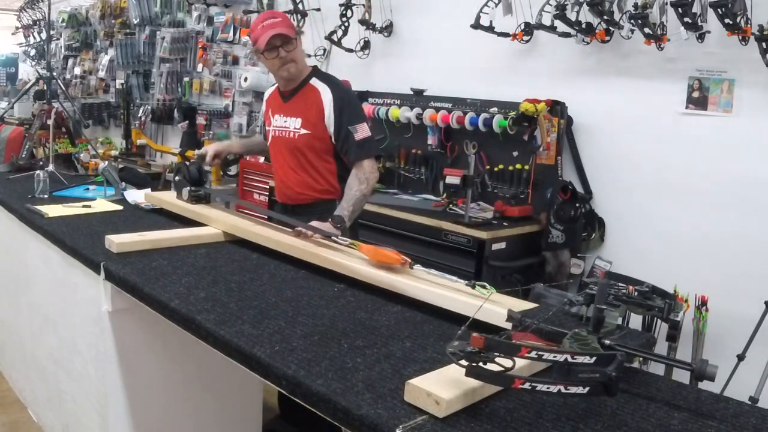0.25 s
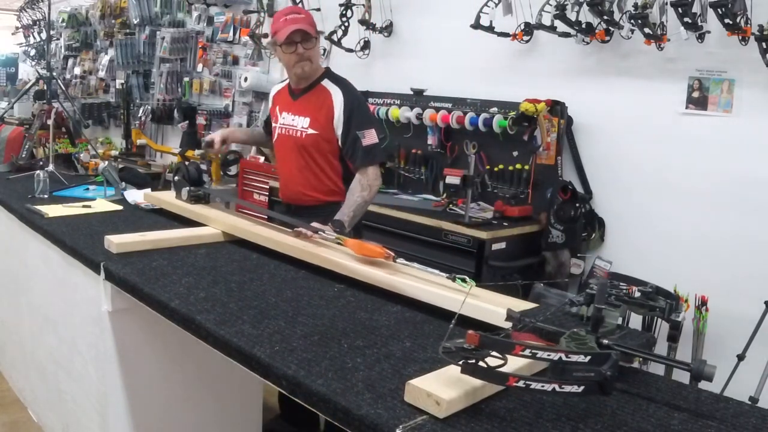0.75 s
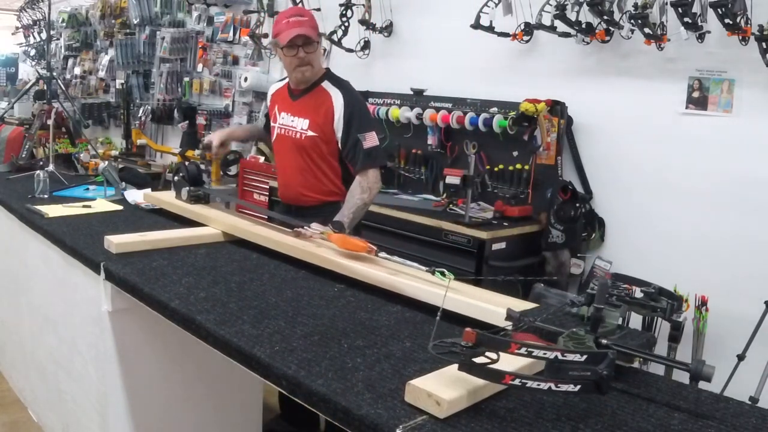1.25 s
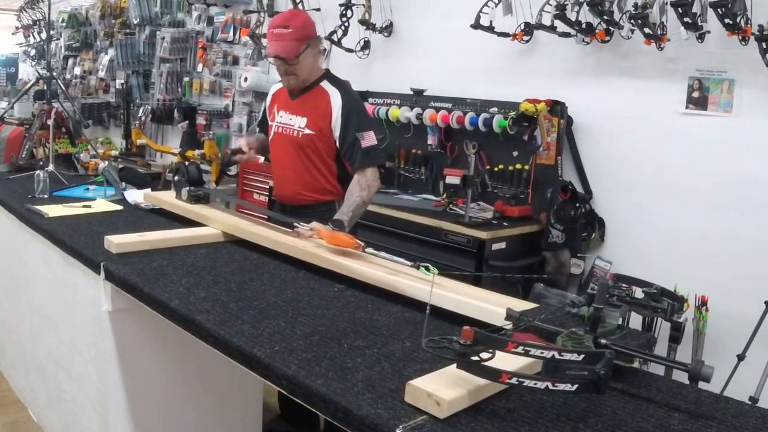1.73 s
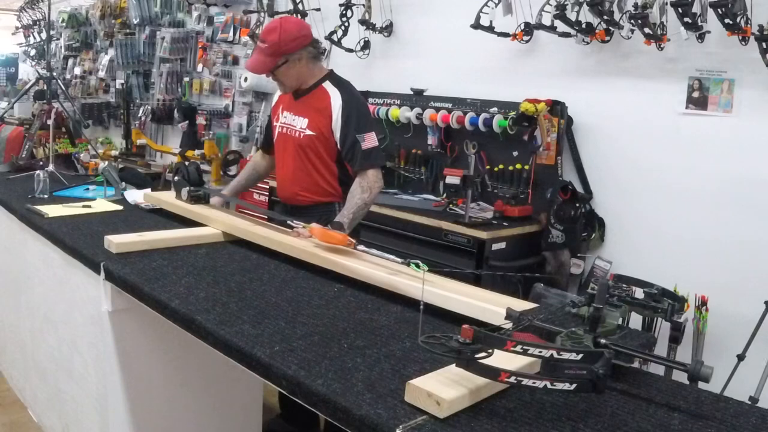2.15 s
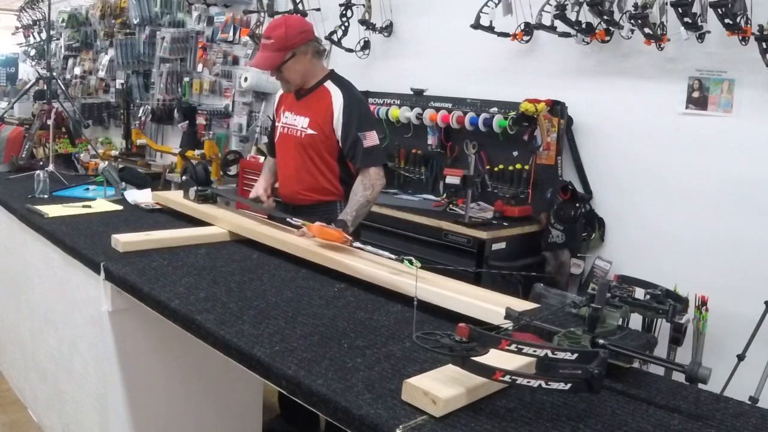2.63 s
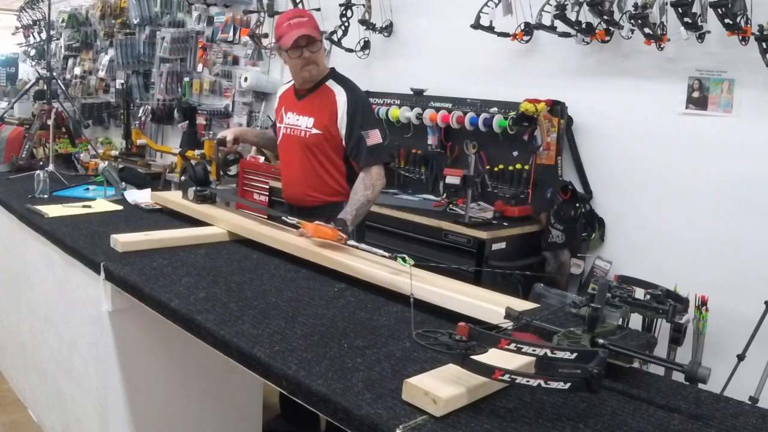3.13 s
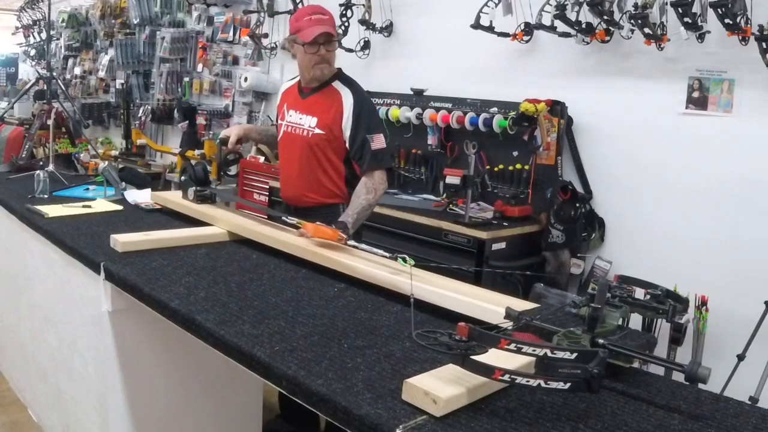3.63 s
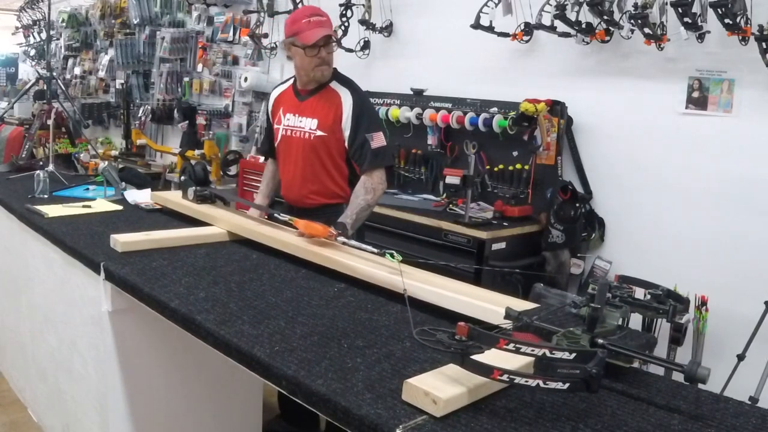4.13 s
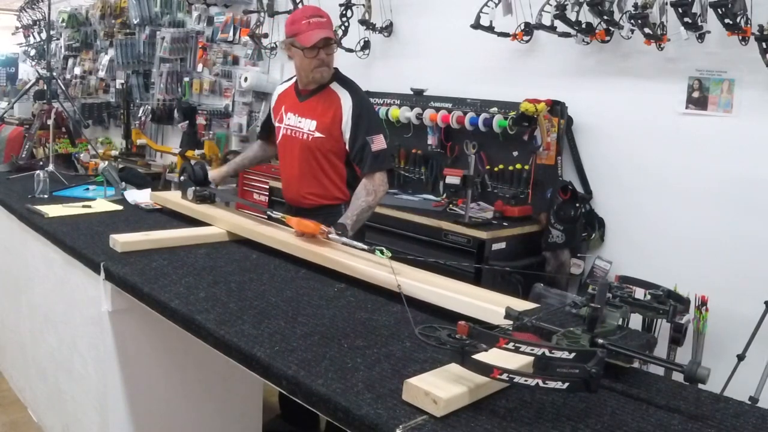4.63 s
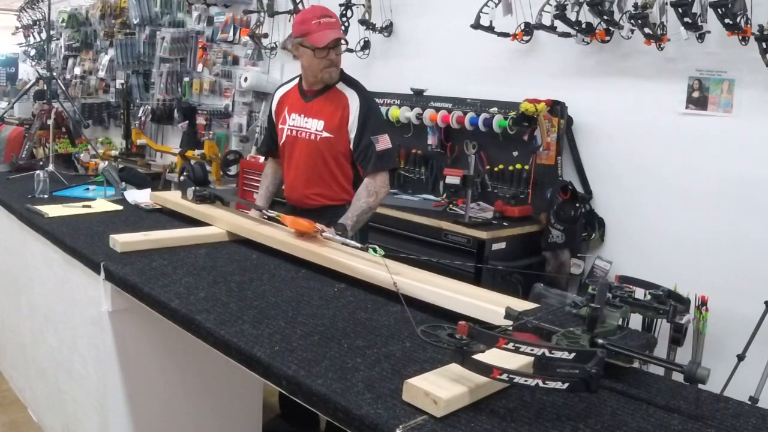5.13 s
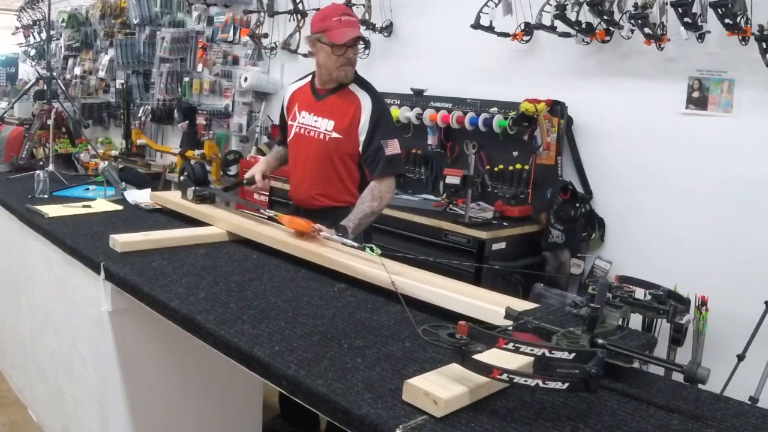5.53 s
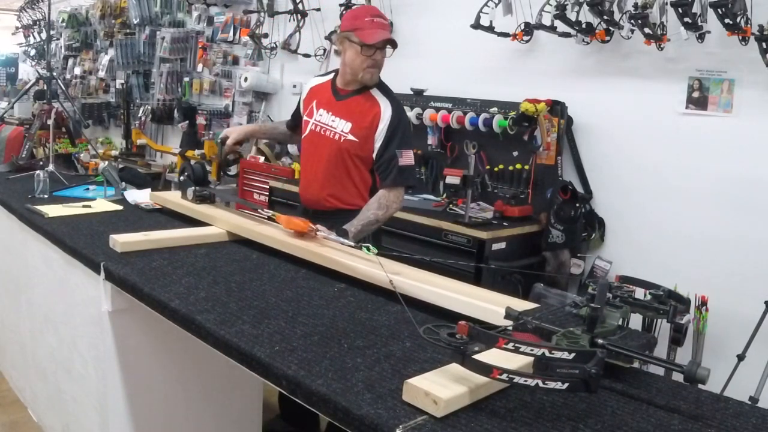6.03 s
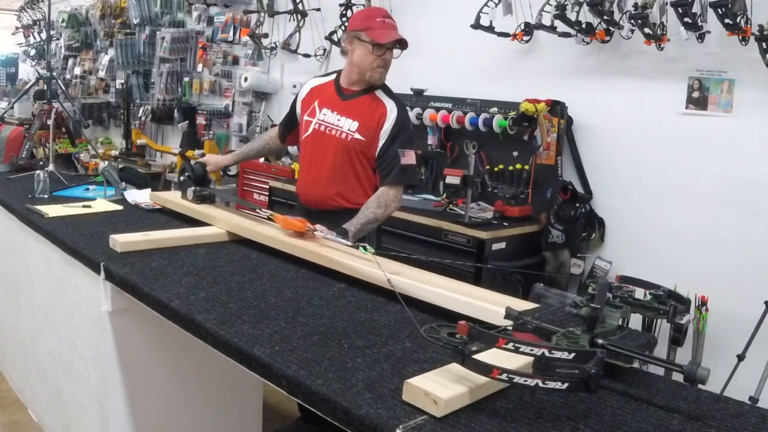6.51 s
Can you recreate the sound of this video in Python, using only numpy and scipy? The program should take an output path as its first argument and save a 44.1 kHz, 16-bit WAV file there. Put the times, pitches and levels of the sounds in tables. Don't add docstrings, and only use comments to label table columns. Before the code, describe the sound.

A hand-cranked winch on a wooden board rattles off loud, bright ratchet clicks, nearly twenty a second at the quickest, with gears grinding faintly beneath. The clicks loosen and stop just before three seconds. After a short near-silence with tiny knocks, clicking restarts and gradually slows to separate snaps. Close mono microphone in a hard-walled workshop with short reflections and a faint fan hum.

```python
import sys
import numpy as np
from scipy import signal
from scipy.fft import rfft, irfft, next_fast_len
from scipy.io import wavfile
from scipy.ndimage import uniform_filter1d, map_coordinates

SR = 44100
rng = np.random.default_rng(int(sys.argv[2]) if len(sys.argv) > 2 else 0)


def master(y):
    cut = np.clip(np.atleast_2d(y).T, -1, 1)
    pcm = np.round(cut * 32767)
    wavfile.write(sys.argv[1], SR, pcm.astype(np.int16))


def level_to_linear(level):
    exponent = np.asarray(level, float) / 20
    return 10 ** exponent


N = 298204
LEAD, RING, SPAN = 512, 8192, 17408

# f/Hz, width/Hz, level/dB
SPRING = [(1870, 1200, -5.5), (2228, 246, 5.5), (2362, 235, 3), (2596, 170, -3), (3123, 544, -11.5)]
STEEL = [(3306, 380, -2.5), (4320, 260, 2), (4890, 420, -0.5), (5920, 2000, -8), (6980, 220, 0.5),
         (7360, 570, -6), (8370, 510, 1), (9350, 840, -7.5), (12700, 830, -13), (15300, 670, -22)]
FRAME = [(1100, 233, -22.5), (1387.4, 174.5, 5), (1420, 259.6, 7.5), (1560, 241, -0.5)]
BOARD = [(432, 77, -3), (519, 11, -11), (626, 49, 0), (889, 73, 0)]
BENCH = [(126, 23, -13), (202.5, 5.5, -4), (230.1, 2.5, 0.5)]


def pawl():
    out = np.zeros(N + SPAN + LEAD)
    creep = 1 - level_to_linear(crank_speed_db().clip(max=0))
    slow_lag_s = 0.0017
    habit = rng.standard_normal((5, RING))
    for s, db, hz, steel_db, board_db, room_db in strikes():
        frame_delay_s = 0.00221 + slow_lag_s * creep[round(s * SR)]
        favoured = [(hz, 160, -3)]
        spring = rung(contact(habit[0], 0.0065, 0.0083, delay_s=-0.0011), SPRING)
        steel = rung(contact(habit[1], 0.002, 0.01, delay_s=-0.0009), STEEL)
        frame = rung(contact(habit[2], 0.021, 0.004, delay_s=frame_delay_s), FRAME + favoured)
        board = rung(contact(habit[3], 0.11, 0.018, delay_s=0.0063), BOARD)
        bench = rung(contact(habit[4], 0.041, 0.018, delay_s=0.00063), BENCH)
        metal = level_to_linear(-8.5) * spring + level_to_linear(steel_db + 3.5) * steel + level_to_linear(-2.0) * frame
        wood = level_to_linear(board_db - 0.5) * board + level_to_linear(-35) * bench
        blow = shop(metal + wood, wet_db=room_db - 3.5, bright_db=0.34 * (steel_db + 8))
        add(out, s, level_to_linear(db) * (blow + wheel()))
    return out[LEAD:][:N]


# t/s, peak level/dB, frame f/Hz, steel level/dB
QUICK = [(0.0232, -3.5, 1500, -4.5), (0.0921, -4, 1480, -4.5), (0.156, -1.5, 1414, -8),
         (0.2228, -5.5, 1426, -3), (0.2903, -1, 1484, -11), (0.3526, -0.5, 1385, -9),
         (0.41, -1.5, 1430, -9), (0.4609, -1, 1420, -14), (0.5062, 0.5, 1420, -13.5),
         (0.5523, -5.5, 1500, -4), (0.6058, -3.5, 1420, -7), (0.6594, -6.5, 1560, -1.5),
         (0.7127, -5, 1420, -2.5), (0.7567, -6.5, 1420, -1.5), (0.8096, -2, 1420, -7.5),
         (0.8651, -1, 1420, -9), (0.9129, -2.5, 1240, -8), (0.9573, -3, 1280, -8.5),
         (0.9956, -3, 1110, -6.5), (1.039, -4.5, 1560, -6.5), (1.0917, -4.5, 1370, -4),
         (1.1484, -6.5, 1560, -4)]
EASING = [(1.2053, -1, 1340, -9), (1.2531, -5, 1510, -3.5), (1.3125, -0.5, 1560, -13),
          (1.3733, -1.5, 1420, -10), (1.4298, -1, 1420, -11.5), (1.483, -1, 1480, -13.5),
          (1.5403, -2, 1420, -10), (1.6047, 0, 1560, -11), (1.6615, -2.5, 1420, -7), (1.731, -3, 1560, -9),
          (1.8065, -4, 1560, -7.5), (1.9069, -4.5, 1460, -10), (2.0179, -6.5, 1610, -8),
          (2.115, -4, 1420, -7), (2.2035, -1.5, 1420, -12), (2.3036, -3.5, 1490, -9.5),
          (2.4806, -6.5, 1538, -8), (2.601, -4.5, 1720, -11), (2.6924, -3.5, 1560, -7),
          (2.7795, -4, 1555, -5.5), (2.9096, -8.5, 1260, -7.5)]
LOADED = [(3.7594, -3.5, 1460, -7), (3.8295, -4, 1460, -7.5), (3.8916, -1, 1466, -11.5),
          (3.9521, -1.5, 1470, -11.5), (4.012, 0, 1370, -13.5), (4.0964, -4, 1510, -8),
          (4.183, -4, 1360, -5.5), (4.2689, -6, 2083, -5.5), (4.365, -1.5, 1560, -10.5),
          (4.436, -5, 1310, -3.5), (4.514, -4, 1536, -7), (4.5995, -2.5, 1603, -8),
          (4.6857, -5, 2170, -7.5), (4.792, -4.5, 1360, -9.5), (4.9358, -7.5, 1387, -6),
          (5.123, -5, 1300, -11.5), (5.353, -7.5, 1560, -7.5), (5.5758, -5.5, 1346, -9),
          (5.8292, -6, 1530, -8.5), (6.0724, -6, 1680, -7), (6.3348, -5.5, 1300, -9),
          (6.6241, -5.5, 1450, -7)]
# t/s, peak level/dB, frame f/Hz, board level/dB
GRAZES = [
    (2.5648, -18.5, 1100, -9.5),
    (3.695, -41.5, 1140, 0.5),
    (5.0915, -44, 1130, 9),
]


def strikes():
    board_db = -19.5
    graze_steel_db, graze_room_db = -22, -6.5
    contacts = []
    for s, db, hz, steel_db in QUICK + EASING + LOADED:
        room_db = 2.5 - 0.8 * (db + 4) - 0.044 * (steel_db + 8)
        contacts.append((s, db, hz, steel_db, board_db, room_db))
    for s, db, hz, graze_board_db in GRAZES:
        contacts.append((s, db, hz, graze_steel_db, graze_board_db, graze_room_db))
    return sorted(contacts)


def contact(habit, rise_s, fall_s, delay_s, fresh=0.4, even=0.45):
    t = (np.arange(RING) - LEAD) / SR - delay_s
    grain = np.sqrt(1 - fresh) * habit + np.sqrt(fresh) * rng.standard_normal(RING)
    envelope_db = np.where(t < 0, 60 * t / rise_s, -60 * t / fall_s).clip(-200, 0)
    z = rfft(grain * level_to_linear(envelope_db))
    flattened = z / uniform_filter1d(np.abs(z), size=15) ** even
    return irfft(flattened) * (t < 0.08)


def rung(force, modes):
    fade = np.hanning(2 * RING)[RING:] ** 0.5
    ring = resonate(force, modes, spread_db=2.0) * fade
    return ring / np.abs(ring).max()


# f/Hz, level/dB, t60/s
WHEEL = [(1420, -29.5, 0.34), (1613, -28, 0.24), (1970, -36, 0.31), (2040, -28, 0.25), (2325, -32, 0.35),
         (2600, -31, 0.27), (4560, -32, 0.24), (4870, -29.5, 0.13), (6680, -38, .22), (7800, -39.5, .15),
         (8170, -38.5, 0.062), (8600, -40.5, 0.18)]


def wheel():
    t = np.arange(SPAN - LEAD) / SR
    hz, db, t60_s = np.transpose(WHEEL)[..., None]
    level_chance, pitch_chance, phase_chance = rng.standard_normal((3, len(WHEEL), 1))
    level = level_to_linear(db + 2.1 * level_chance - 60 * t / t60_s)
    rings = level * np.sin(2 * np.pi * hz * (1 + 0.008 * pitch_chance) * t + 3 * phase_chance)
    onset = 1 - np.exp(-t / 0.002)
    return np.pad(rings.sum(axis=0) * onset, (LEAD, 0))


# delay t/s, level/dB
ECHOES = [(.0045, -9.5), (.0085, -18), (0.014, -18.5), (0.0178, -15), (.021, -22), (0.027, -22)]
# f/Hz, early t60/s, late t60/s
SHOP = [(151.4, 0.82, 0.8), (400, 0.21, 0.15), (1020, 0.16, 0.55), (2700, 0.14, 0.47), (7360, 0.15, 0.5)]
SHOP_TOP = [(10000, .15, .24), (11000, .12, .19), (15000, .11, .16)]
# f/Hz, level/(dB per Hz)
WALLS = [(150, -25.5), (300, -16.5), (600, -16.5), (1000, -10.5), (1450, -4), (1750, -7.5), (2350, -5.5),
         (3000, -12), (4600, -11.5), (6200, -18), (7600, -20.5), (8500, -14.5), (9800, -23.5), (15000, -32)]


def shop(x, wet_db, bright_db):
    late_db, tint_db, buildup_s = -17, 3.0, 0.0026
    far_wall_s, far_wall_db = 0.186, -51
    hz, t, z = signal.stft(rng.standard_normal(SPAN), SR, nperseg=512)
    decay = SHOP + SHOP_TOP
    early_s = along([(f, early) for f, early, late in decay], hz)[:, None]
    late_s = along([(f, late) for f, early, late in decay], hz)[:, None]
    tint = tint_db * unit(uniform_filter1d(rng.standard_normal(len(hz)), size=3))
    brightness = along([(2500, 0.0088), (4000, bright_db)], hz)
    colour = level_to_linear(along(WALLS, hz) + brightness + tint)[:, None]
    fall = level_to_linear(-60 * t / early_s) + level_to_linear(late_db - 60 * t / late_s)
    tail = signal.istft(z * colour * fall, SR, nperseg=512)[1][:SPAN]
    tail *= level_to_linear(wet_db) * (1 - np.exp(-np.arange(SPAN) / SR / buildup_s))
    near = np.zeros(SPAN - RING + 1)
    near[0] = 1
    for s, db in ECHOES:
        near[round(s * SR)] = level_to_linear(db + rng.normal(0, 0.84))
    shelves = round(far_wall_s * SR) + 3 * rng.integers(100, size=6)
    near[np.r_[shelves, shelves + 1]] = level_to_linear(far_wall_db)
    return signal.fftconvolve(x, near) + np.pad(tail, (LEAD, 0))[:SPAN]


def crank_speed_db():
    usual_teeth_per_s, hand_s = 15, 0.06
    s = np.array([row[0] for row in QUICK + EASING + LOADED])
    gap_s = np.diff(s)[np.searchsorted(s[1:-1], np.arange(N) / SR)]
    return uniform_filter1d(-20 * np.log10(gap_s * usual_teeth_per_s), size=round(hand_s * SR))


def gears():
    speed_db = crank_speed_db()
    rattle_s, rattle_width_s, rattle_peak_db = 0.97, 0.07, 6
    rattle_db = rattle_peak_db * np.exp(-((np.arange(N) / SR - rattle_s) / rattle_width_s) ** 2)
    body = unit(resonate(grit(), BOARD[2:] + FRAME + SPRING))
    grind = body + level_to_linear(-11) * unit(resonate(grit(), STEEL))
    rumble = unit(resonate(grit(), BOARD + BENCH + [(70, 21, -11.0)]))
    grind_db = -38 + 2.17 * speed_db
    rumble_db = -42 + 2.03 * speed_db + rattle_db
    return level_to_linear(grind_db) * grind + level_to_linear(rumble_db) * rumble


def grit():
    return rng.standard_normal(N) * level_to_linear(2.5 * wobble(45) + 2.5 * wobble(300))


# t/s, peak level/dB, f/Hz
PLAY = [(3.631, -57.5, 377), (3.649, -53, 110), (3.677, -48, 1280), (3.722, -30.5, 1410), (4.172, -24, 450),
        (5.298, -46, 500), (5.539, -38, 400), (5.546, -55, 1340), (5.795, -41, 800), (6.046, -40, 1364),
        (6.28, -47, 315), (6.581, -48, 317.6)]


def play():
    out = np.zeros(N + SPAN + LEAD)
    for s, db, hz in PLAY:
        force = contact(0, 0.03, 0.05, delay_s=0.001, fresh=1, even=0)
        dull = uniform_filter1d(force, size=4)
        knock = rung(dull, [(hz, 350, 0), (2400, 1500, -17), (6000, 3000, -34)])
        add(out, s, level_to_linear(db - 2.0) * shop(knock, wet_db=7, bright_db=-27))
    return out[LEAD:][:N]


# f/Hz, level/(dB per Hz)
AIR = [(20, -1), (40, 4.5), (60, -17), (100, -9), (160, -7), (250, -13), (400, -17.5), (1000, -24.5),
       (4000, -32), (15000, -36.5)]
# f/Hz, level/dB
FAN = [
    (64.6, -74),
    (129.2, -75),
    (360.7, -81),
]


def air():
    t = np.arange(N) / SR
    hush = irfft(rfft(rng.standard_normal(N)) * level_to_linear(along(AIR, np.fft.rfftfreq(N, 1 / SR))), N)
    hum = sum(level_to_linear(db + 6 + 1.5 * wobble(18)) * np.sin(2 * np.pi * hz * t) for hz, db in FAN)
    return level_to_linear(-60.5 + 1.5 * wobble(10)) * unit(hush) + hum


def resonate(x, modes, spread_db=0.0):
    m = next_fast_len(x.shape[-1] + 4096)
    f = np.fft.rfftfreq(m, 1 / SR)
    gain = 0
    for k, (centre, width, db) in enumerate(modes):
        strength = (-1) ** k * level_to_linear(db + spread_db * rng.standard_normal())
        gain = gain + strength * 1j * f * width / (centre * centre - f * f + 1j * f * width)
    return irfft(rfft(x, m) * gain, m)[..., :x.shape[-1]]


def add(out, s, x):
    out[round(s * SR):][:SPAN] += x


def unit(x):
    return x / np.sqrt(np.mean(x ** 2) + 1e-20)


def along(points, hz):
    f, v = np.transpose(points)
    return np.interp(np.log(hz + 1), np.log(f + 1), v)


def wobble(rate_hz):
    knots = rng.standard_normal(int(N * rate_hz / SR) + 4)
    return map_coordinates(knots, [np.arange(N) * rate_hz / SR])


def scene():
    return (pawl() + play() + gears() + air())[None]


# f/Hz, level/dB
TOP = [(20, -7.5), (60, -3), (15150, -2), (15300, -17.5), (16400, -29), (16600, -73)]


def microphone(dry):
    return irfft(rfft(dry) * level_to_linear(along(TOP, np.fft.rfftfreq(N, 1 / SR))), N)


def roll_off(x):
    return signal.sosfilt(signal.butter(12, 16480, fs=SR, output="sos"), x)


def record(dry):
    mix = microphone(dry)
    return roll_off(mix)


dry = scene()
out = record(dry)
master(out)
```